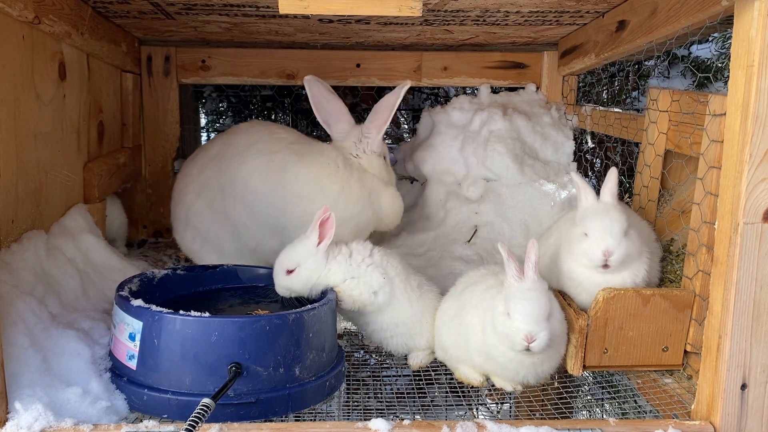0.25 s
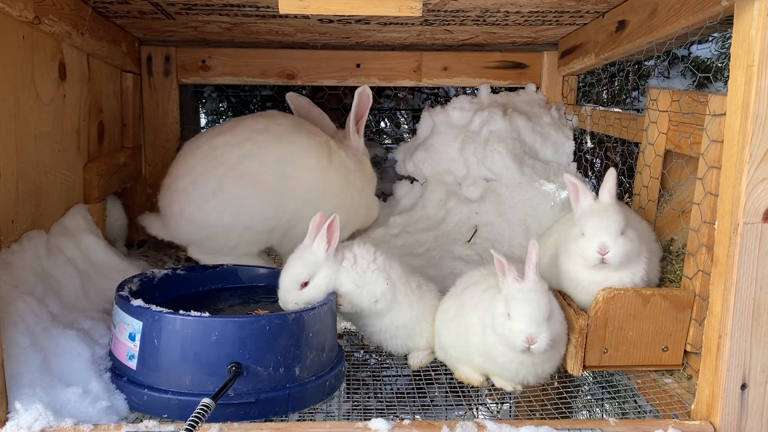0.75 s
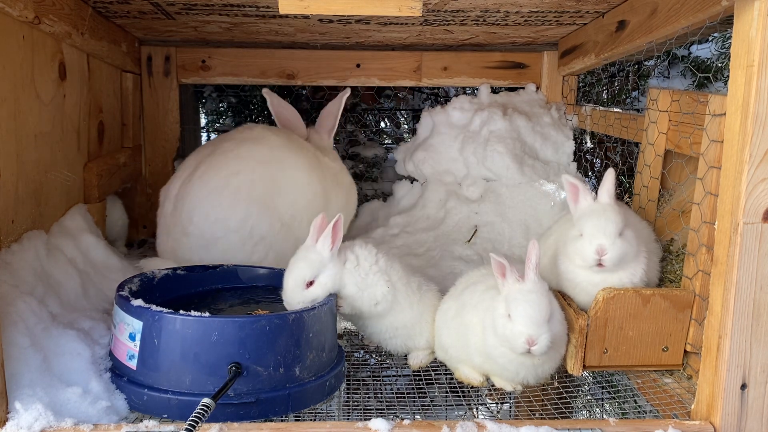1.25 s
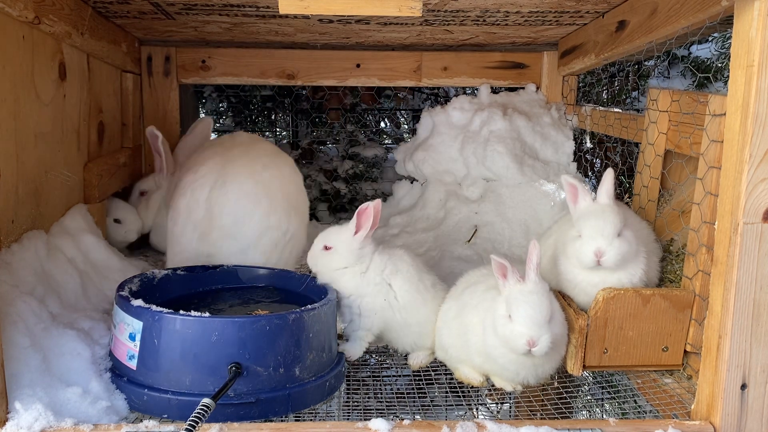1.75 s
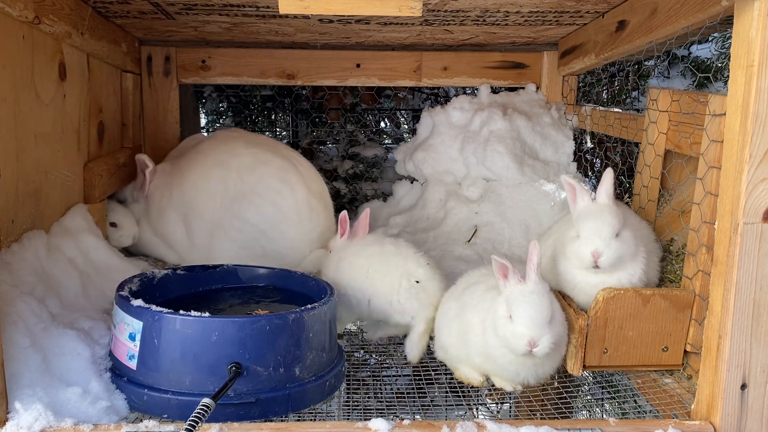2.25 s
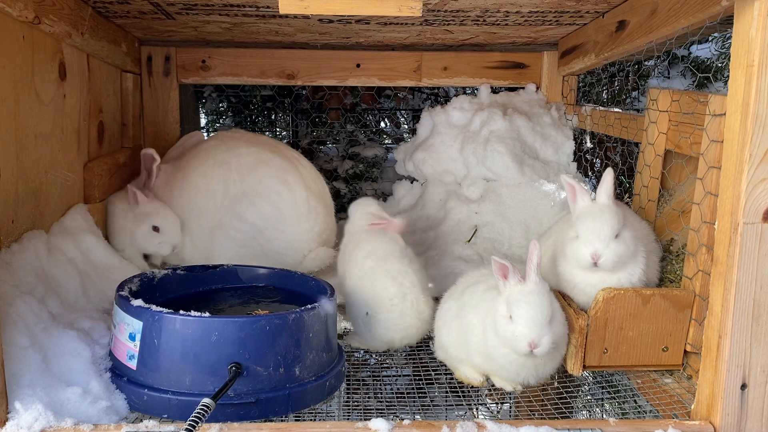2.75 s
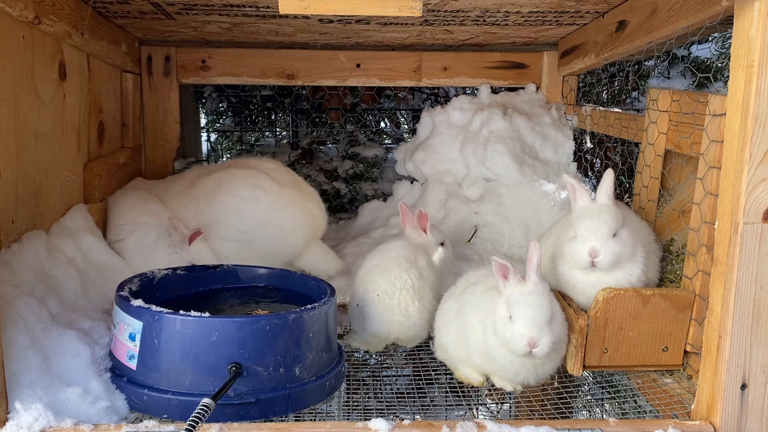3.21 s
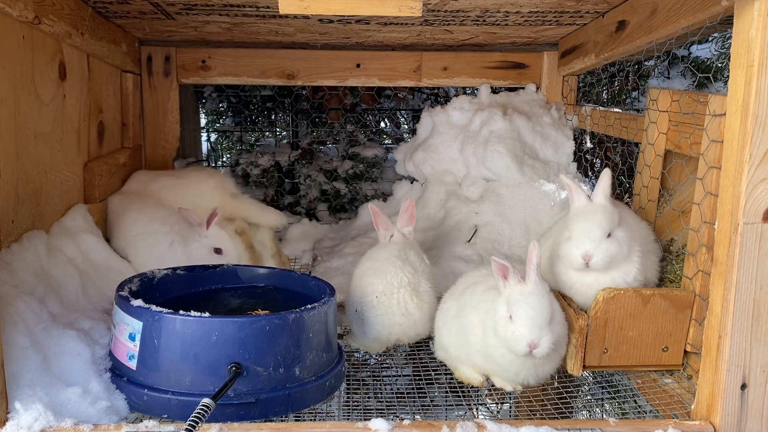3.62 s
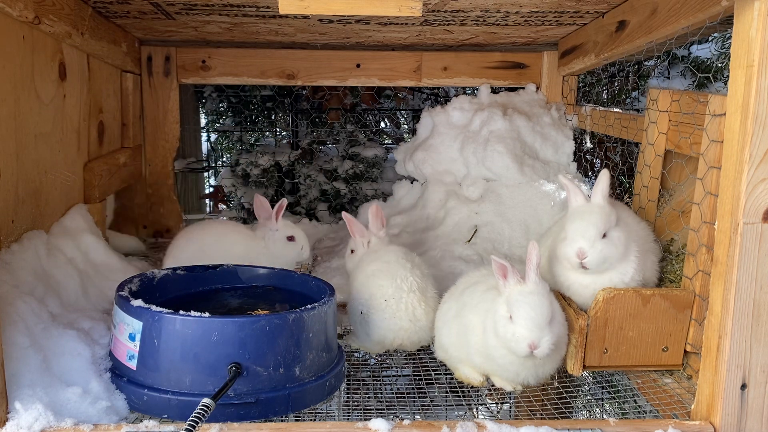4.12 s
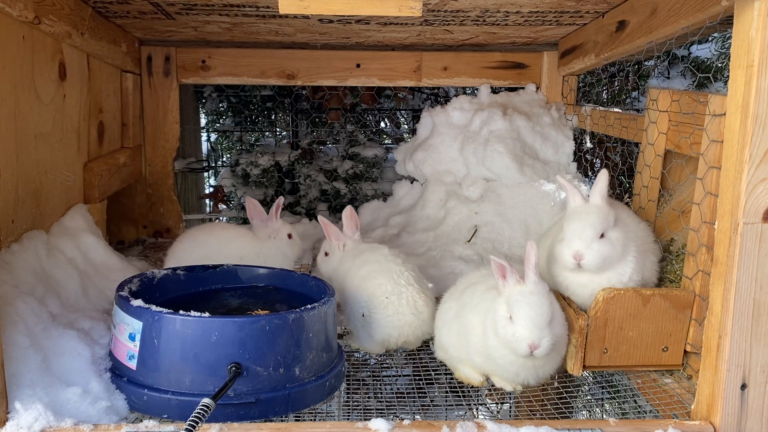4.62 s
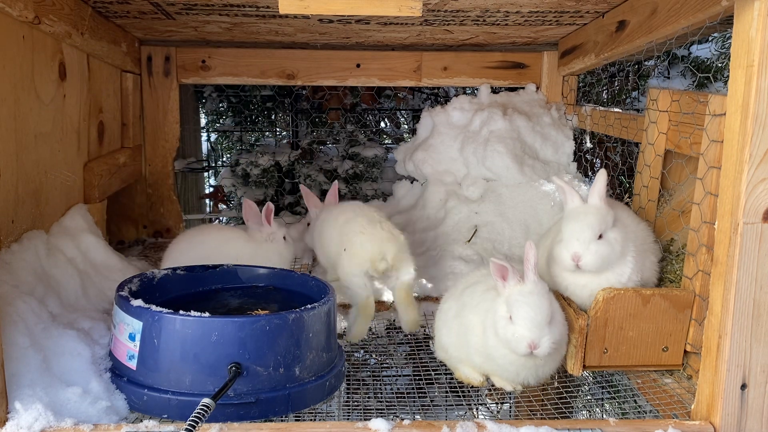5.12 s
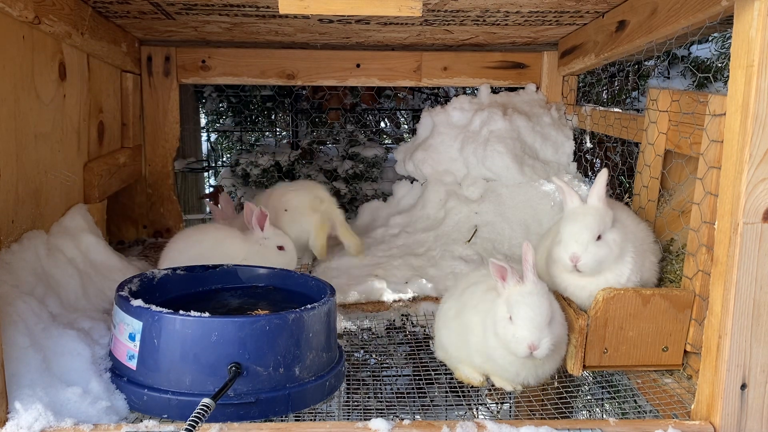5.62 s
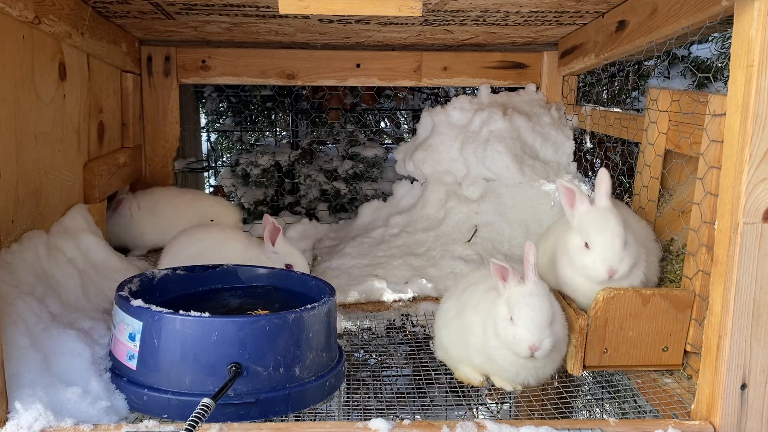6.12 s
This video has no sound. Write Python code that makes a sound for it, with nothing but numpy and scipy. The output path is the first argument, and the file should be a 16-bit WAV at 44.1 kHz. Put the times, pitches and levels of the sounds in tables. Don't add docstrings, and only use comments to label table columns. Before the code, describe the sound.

Rabbits shuffle and scuff on a springy wire floor in a wooden hutch, with light ticks, soft thumps and one louder wooden knock.

```python
import sys
import numpy as np
from scipy import signal
from scipy.fft import rfft, irfft, next_fast_len
from scipy.io import wavfile
from scipy.ndimage import uniform_filter1d

SR = 44100
rng = np.random.default_rng(int(sys.argv[2]) if len(sys.argv) > 2 else 0)


def digitize_waveform(pressure):
    field = np.atleast_2d(pressure).T
    bounded = np.clip(field, -1, 1)
    quanta = np.round(bounded * 32767).astype(np.int16)
    wavfile.write(sys.argv[1], SR, quanta)


def voltage_ratio(decibels):
    exponent = np.asarray(decibels, float) / 20
    return 10 ** exponent


N = 280322
SIZE = next_fast_len(N + 2000)
HZ = np.fft.rfftfreq(SIZE, 1 / SR)

# (time [s], floor shake level [dB], shuffle level [dB], time to die by 20 dB [s])
STEPS = [(0.0, -47.5, -60.5, 0), (0.28, -51, -56, 0.6), (0.57, -54, -47, -0.12), (0.67, -45, -59, 0.3),
         (0.78, -46, -57, 0.36), (1.27, -57, -64, 2), (2.0, -46.5, -56, 0.5), (2.81, -65, -67, 1),
         (2.92, -50.5, -60, 0.9), (3.17, -51.5, -64, 1.2), (3.39, -45, -65, -0.1), (3.72, -43.5, -56, 0.53),
         (4.0, -38, -55, 0.37), (4.16, -69.5, -67, -3), (4.27, -56, -46.5, 0.26), (4.34, -58, -48.5, 0.2),
         (4.45, -43.5, -62, 0.13), (4.6, -46, -45.5, 0.23), (4.76, -47.5, -53.5, 0.47),
         (4.908, -60, -49, 0), (5.05, -57, -72, -0.3), (5.31, -50, -77, 0.34), (5.86, -59, -61.5, -0.1),
         (6.05, -55, -62.5, 0.7), (6.2, -50.5, -73, 3)]


def rms_one(x):
    return x / np.sqrt(np.mean(x ** 2) + 1e-20)


def at_hz(points, hz, axis=1):
    points = np.array(points)
    return np.interp(np.log(hz + 1), np.log(points[:, 0]), points[:, axis])


def drift(rate):
    r = np.exp(-80 * np.pi * rate / SR)
    slow = signal.lfilter([1], [1, -2 * r, r * r], rng.standard_normal(N // 40 + 2002))[2000:]
    return np.interp(np.arange(N) / 40, np.arange(len(slow)), rms_one(slow))


def resonance(x, hz, width_hz):
    r = np.exp(-np.pi * width_hz / SR)
    zeros = np.array([1, 0, -1]) * (1 - r * r) / 2
    return signal.lfilter(zeros, [1, -2 * r * np.cos(2 * np.pi * hz / SR), r * r], x)


def cut(x, hz, kind, order=2):
    return signal.sosfilt(signal.butter(order, np.clip(hz, 10, .45 * SR), kind, fs=SR, output="sos"), x)


def colour(x, spectrum):
    return rms_one(irfft(rfft(x, SIZE) * voltage_ratio(at_hz(spectrum, HZ)), SIZE)[..., :N])


def add(out, s, sound, peak_db):
    at = round(s * SR)
    out[at:at + len(sound)] += (voltage_ratio(peak_db) * sound / np.abs(sound).max())[:N - at]


def fade(t, t60):
    return voltage_ratio(-60 * t / t60)


def swells(s, peak_db, rise, fall, rest_db):
    t = np.arange(0, N + 64, 64) / SR - s[:, None]
    slope_s = np.where(t < 0, rise[:, None], fall[:, None])
    drop = 20 * np.abs(t) / np.clip(slope_s, .004, 2)
    power = (voltage_ratio(peak_db[:, None] - drop) ** 2).sum(axis=0) + voltage_ratio(rest_db) ** 2
    return np.interp(np.arange(N) / 64, np.arange(len(power)), 10 * np.log10(power))


def friction(level_db, spectrum, per_s, spread_db, patchy_db, tint_db):
    sizes = voltage_ratio(spread_db * np.minimum(rng.exponential(1, N), 4)) * rng.choice([-1, 1], N)
    grains = rfft(colour(sizes * (rng.random(N) < per_s / SR), spectrum), SIZE)
    edges = np.geomspace(spectrum[0][0], spectrum[-1][0], 8)
    band = np.digitize(HZ, edges[1:-1])
    tinted = sum(voltage_ratio(tint_db * drift(7.0)) * irfft(grains * (band == k), SIZE)[:N] for k in range(7))
    patches = drift(9.2) + drift(60)
    return voltage_ratio(level_db + patchy_db * patches) * rms_one(tinted)


def scuffs(rows, treble_db, swell, top_hz):
    out, t = np.zeros(N), np.arange(4000) / SR
    for s, db, hz, t60 in rows:
        spray = rng.standard_normal(len(t)) * voltage_ratio(3 * rng.standard_normal(len(t)))
        body = rms_one(cut(spray, [1100, 4000], "band") * 0.66 + 0.77 * resonance(spray, hz, 0.11 * hz))
        treble = cut(cut(spray, 4100, "high"), 4400, "low", order=1)
        treble += 0.93 * resonance(spray, 4100, 300)
        sound = body + voltage_ratio(treble_db + 4.5) * rms_one(cut(treble, top_hz, "low"))
        add(out, s - 0.315 * swell, sound * np.minimum(t / swell, 1) * fade(t, t60), db - 3.0)
    return out


def slips(rows, width):
    out, t = np.zeros(N), np.arange(6000) / SR - .04
    for s, db, hz, fall in rows:
        width_hz, rise = width * hz, 0.71 * fall
        jerks = rng.standard_normal(len(t)) * voltage_ratio(6.7 * rng.standard_normal(len(t)))
        tone = resonance(resonance(jerks, hz, width_hz), hz, 1.5 * width_hz)
        add(out, s - .04, tone * np.exp(-np.abs(t) / np.where(t < 0, rise, fall)), db)
    return out


def rings(rows, width):
    out, t = np.zeros(N), np.arange(5000) / SR
    for s, db, hz, t60 in rows:
        push = rng.standard_normal(len(t)) * np.minimum(t * hz / 0.85, 1) * fade(t, np.clip(t60, .004, .3))
        add(out, s, resonance(resonance(push, hz, width * hz), hz, 2 * width * hz), db)
    return out


def bump():
    # (pitch [Hz], peak level [dB], t60 [s], build-up [s], delay [s])
    modes = [(99.5, -42, .48, .01, .0025), (148.7, -23.5, .24, .011, -.0021),
             (252.5, -21, .087, .066, .0011), (282, -40, .12, .015, .0035), (323.4, -32, .048, .009, 0),
             (427.8, -25.2, .048, .0003, .0027), (655, -27.7, .031, .0009, .0009),
             (825, -28.2, .0104, .006, .0029), (850, -29.1, .021, .0026, .0013)]
    out, t = np.zeros(N), np.arange(20000) / SR
    for hz, db, t60, build, delay in modes:
        ring = np.sin(2 * np.pi * hz * t) * (1 - np.exp(-t / build)) ** 2 * fade(t, t60)
        add(out, 4.587 + delay, ring, db)
    return out


def landings():
    # (time [s], peak level [dB], end pitch [Hz], length [s], extra pitch at the start [share])
    rows = [(0.461, -43, 62, 0.02, 0.27), (0.845, -41.5, 88, 0.021, 0.61), (1.977, -48, 88, 0.077, 0.36),
            (3.017, -46.5, 100, 0.04, 0.86), (3.693, -40, 63.3, 0.05, 0.46), (3.748, -44, 65.4, 0.036, 0.4),
            (3.998, -40.5, 67.2, 0.0226, 2.3), (4.049, -43, 64, 0.034, 0.24), (4.11, -36, 85.3, 0.022, 0.9),
            (4.135, -37.5, 56.2, 0.033, 0.33), (4.248, -40, 82.8, 0.051, 0.97),
            (4.317, -41, 92, 0.04, 0.97), (4.366, -38.5, 65, 0.028, 0.25), (4.801, -40, 70.4, 0.032, 0.19),
            (5.015, -35.5, 64.4, 0.06, 2.6), (5.1, -42.5, 71, 0.022, 0.54), (5.185, -38, 58.6, 0.041, 0.3),
            (5.238, -41, 64.6, 0.052, 0.6)]
    out = np.zeros(N)
    for s, db, hz, length, glide in rows:
        t = np.arange(round(1.3 * length * SR)) / SR
        pitch = hz * (1 + glide * np.exp(-t / 0.0131))
        bend = np.sin(2 * np.pi * np.cumsum(pitch) / SR)
        rattle = rms_one(resonance(rng.standard_normal(9000), 3.06 * hz, 23)[-len(t):])
        add(out, s, (bend + .07 * rattle) * np.abs(np.sin(np.pi * t / t[-1])) ** .8, db)
    return out


def floor_shake():
    s, shake_db, _, fall = np.transpose(STEPS)
    level_db = swells(s, shake_db, 0.68 * fall, fall, rest_db=-65)
    push = rng.standard_normal((2, N))
    sway = resonance(push[0], 74.9, 6.5) + 0.3 * resonance(push[1], 101.7, 8.3)
    return voltage_ratio(level_db - 7.5) * rms_one(sway)


def thuds():
    # (time [s], peak level [dB], pitch [Hz], t60 [s])
    rows = [(0.585, -49.5, 212, 0.23), (2.035, -46, 183, 0.1), (3.24, -54, 274, 0.062),
            (3.435, -45, 647, 0.18), (3.44, -51.5, 300, 0.089), (3.53, -52.5, 348, 0.11),
            (3.995, -39, 200, 0.11), (4.262, -43.5, 170, 0.18), (4.625, -35, 72, 0.084),
            (4.23, -52, 478, 0.054), (5.012, -52.5, 580, 0.082), (5.018, -49, 400, 0.042),
            (5.03, -61, 186, 0.046), (5.812, -50.5, 249, 0.039), (5.875, -47.5, 139, 0.07),
            (6.05, -57.5, 160, 0.23)]
    return rings(rows, width=0.33)


def shuffle():
    # (frequency [Hz], density [dB per Hz])
    spectrum = [(90, -1), (150, 14), (300, 3), (600, 0.5), (1200, -17.5), (2000, -53)]
    s, _, shuffle_db, fall = np.transpose(STEPS)
    level_db = swells(s, shuffle_db, 0.68 * fall, fall, rest_db=-64.5)
    return friction(level_db - 5.0, spectrum, per_s=4800, spread_db=2.0, patchy_db=2.5, tint_db=3.5)


def brushes():
    # (time at loudest [s], peak level [dB], top frequency [Hz], half length [s])
    rows = [(3.768, -47, 620, 0.011), (3.957, -50, 800, 0.012), (3.989, -42, 845, 0.012),
            (4.01, -38, 970, 0.0055), (4.243, -48, 770, 0.0086), (4.266, -44, 664, 0.011),
            (4.326, -46.5, 1050, 0.014), (4.344, -43, 820, 0.015), (4.598, -45, 856, 0.0077),
            (5.021, -53, 810, 0.0049), (5.18, -55, 694, 0.0053)]
    out, t = np.zeros(N), np.arange(3600) / SR - .04
    for s, db, top_hz, half in rows:
        puff = cut(rng.standard_normal(len(t)), [180, top_hz], "band")
        add(out, s + t[0], puff * np.exp(-(t / half) ** 2), db)
    return out


def claw_scuffs():
    # (time [s], peak level [dB], colour [Hz], t60 [s])
    rows = [(0.066, -56.5, 3800, 0.046), (0.5778, -51, 3220, 0.15), (0.7135, -40, 1900, 0.058),
            (0.8142, -34, 4170, 0.028), (1.311, -47.5, 2720, 0.061), (1.335, -54.5, 2620, 0.41),
            (1.5005, -53, 2170, 0.018), (1.7561, -41.5, 2250, 0.043), (1.931, -56, 4080, 0.084),
            (2.0523, -51, 2600, 0.073), (3.033, -46, 2260, 0.035), (3.071, -58, 1720, 0.02),
            (3.2495, -52, 2400, 0.033), (3.4684, -47.5, 1930, 0.06), (3.9469, -41.5, 1490, 0.045),
            (4.259, -54, 1860, 0.082), (4.3284, -63.5, 1500, 0.087), (4.4455, -43.5, 4570, 0.027),
            (5.012, -48.5, 4280, 0.046), (5.35, -60, 4300, 0.049)]
    return scuffs(rows, treble_db=-8.5, swell=0.002, top_hz=17000)


def pad_scuffs():
    # (time [s], peak level [dB], colour [Hz], t60 [s])
    rows = [(0.6085, -42, 1600, 0.021), (1.3748, -54, 1760, 0.076), (1.431, -54.5, 2530, 0.28),
            (1.658, -44, 3420, 0.059), (2.0195, -39, 2480, 0.045), (3.1382, -47, 1390, 0.015),
            (3.4007, -46.5, 2210, 0.17), (3.4337, -46.5, 1590, 0.14), (3.6486, -48, 3480, 0.089),
            (3.7532, -46, 1530, 0.051), (3.9046, -48, 2140, 0.12), (3.9694, -43, 2080, 0.043),
            (4.5945, -31, 4830, 0.033), (4.6495, -36.5, 2970, 0.042), (4.6643, -29.5, 4570, 0.044),
            (4.8864, -54, 1940, 0.09), (5.0669, -56.5, 1790, 0.047)]
    return scuffs(rows, treble_db=-22.5, swell=0.0022, top_hz=8500)


def fur_rub():
    # (time at loudest [s], level [dB], time to rise 20 dB [s], time to die by 20 dB [s])
    strokes = [(0.49, -70, -0.07, 0.44), (0.6, -56.5, 0.09, 0.01), (0.721, -64, 0.03, -0.12),
               (0.81, -71.5, 0.63, 0.23), (1.34, -65.5, 0.06, 0.16), (1.44, -64, 0.06, 0.03),
               (1.66, -85, 1, -1), (1.77, -67.5, 0.05, 0.1), (1.93, -70.5, .1, 0.1),
               (2.02, -78.5, -0.5, 0.9), (2.47, -75, 0.2, 0.4), (2.67, -75, -0.2, 1),
               (2.82, -66.5, 0.07, 0.3), (2.995, -66, 0.08, 0.5), (3.036, -52, 0.0861, -0.02),
               (3.132, -52.5, 0.12, 0.05), (3.27, -60, 0.31, -0.15), (3.44, -58, 0.17, 0.1),
               (3.63, -60.5, 0.27, 0.3), (3.91, -62.5, 0.1, 0.1), (3.75, -70, 1, 0.9),
               (3.97, -54, 0.01, 0.05), (4.04, -61, 0, 0), (4.11, -71, -0.2, -0.3),
               (4.318, -65.5, 0.14, 0.07), (4.424, -66, -1.5, 0.44), (4.596, -57, -0.07, 0.07),
               (4.67, -54.5, -0.12, 0.05), (4.93, -65.5, -0.04, 0.2), (5.13, -67, 0.12, 0.17),
               (5.29, -68, 0.3, 0.2), (5.54, -69.5, 0.06, 0.18), (5.91, -83, 1, 2.5)]
    # (frequency [Hz], density [dB per Hz])
    spectrum = [(2000, 2), (3400, -5), (4300, -6), (4800, -5.5), (5500, -5.5), (7000, -7), (11000, -9),
                (16000, -13)]
    level_db = swells(*np.transpose(strokes), rest_db=-100)
    return friction(level_db - 4.0, spectrum, per_s=5000, spread_db=2.0, patchy_db=1.5, tint_db=3.0)


def snow_crunch():
    # (time at loudest [s], level [dB], time to die by 20 dB [s])
    rows = [(0.072, -67.5, 0.08), (0.366, -69, 0.01), (0.599, -65, 0.02), (0.72, -59, -0.01),
            (1.449, -69.5, 0.18), (1.669, -72, 0.2), (1.79, -73, 0.1), (1.93, -72.5, 0.03),
            (2.02, -71.5, 0.33), (2.51, -78.5, 0.5), (3.03, -77, -0.5), (3.6, -77, 0.3), (3.13, -70, -0.9),
            (3.266, -65, 0.06), (3.43, -71, -0.45), (3.98, -78, -2), (4.01, -67.5, 0.2), (4.34, -71, 0.1),
            (4.5, -77, 0.5), (4.62, -87, 1), (4.68, -69, 0.14), (4.891, -61.5, 0.06), (5.25, -76.5, 0.5),
            (5.83, -74.5, 0.7)]
    # (frequency [Hz], density [dB per Hz])
    spectrum = [(700, -20), (1200, 9.5), (1800, 4), (2700, -2), (3600, -15.5), (6000, -21.5)]
    s, db, fall = np.transpose(rows)
    level_db = swells(s, db, 0.26 * fall, fall, rest_db=-89.5)
    return friction(level_db + 2.5, spectrum, per_s=3300, spread_db=4.0, patchy_db=2.5, tint_db=1.5)


def snaps():
    # (time [s], peak level [dB], lowest frequency [Hz])
    rows = [(s, db, 5000) for s, db in [(0.2176, -67), (0.357, -69), (0.3721, -66), (0.5982, -45.5),
            (0.63, -55), (0.973, -62), (2.153, -65), (3.3784, -55), (3.5456, -58), (4.4283, -69),
            (4.6977, -46), (5.52, -63), (5.7324, -63)]] + [(1.72, -41, 8000), (5.9115, -37.5, 12600)]
    out, t = np.zeros(N), np.arange(800) / SR
    for s, db, hz in rows:
        crack = rng.standard_normal(len(t)) * (fade(t, 0.0038) + 0.15 * fade(t, 0.035))
        add(out, s, cut(crack, hz, "high"), db + 3.5)
    return out


def ticks():
    # (time [s], peak level [dB], ring [Hz], t60 [s])
    rows = [(0.103, -56, 1060, 0.012), (0.337, -51, 1180, 0.014), (0.611, -45.5, 1040, 0.0045),
            (0.735, -47.5, 1460, 0.0088), (0.777, -48.5, 1080, 0.006), (2.11, -42.5, 1200, 0.0094),
            (2.355, -61, 1385, 0.031), (2.514, -45.5, 1200, 0.0084), (2.726, -55, 940, 0.0071),
            (3.209, -55.5, 1270, 0.015), (3.555, -51, 980, 0.0087), (3.579, -42, 1210, 0.0066),
            (4.492, -49, 1010, 0.007), (4.911, -53.5, 1100, 0.01), (5.487, -66.5, 1290, 0.01),
            (5.695, -58, 1230, 0.022), (5.776, -66, 1460, 0.0086)]
    out, t = np.zeros(N), np.arange(1800) / SR
    for s, db, hz, t60 in rows:
        ring = np.sin(2 * np.pi * hz * t) * fade(t, t60)
        ring += .7 * np.sin(2 * np.pi * 1.6 * hz * t) * fade(t, .006)
        ring += .4 * np.sin(2 * np.pi * 2.7 * hz * t) * fade(t, .003)
        echo = .3 * cut(np.interp(t - .0037, t, ring, left=0), 2500, "low")
        wash = cut(rng.standard_normal(len(t)), [500, 2400], "band") * fade(t, 0.11)
        wash *= np.minimum(t / 0.0008, 1)
        add(out, s + .0007, -cut(ring + echo + .2 * wash, [450, 3300], "band"), db + 7)
    return out


def squeaks():
    # (time at loudest [s], peak level [dB], pitch [Hz], fall [s])
    rows = [
        (1.316, -57, 2650, 0.0046),
        (1.352, -57, 2690, 0.013),
        (1.387, -59, 1720, 0.0087),
        (1.452, -48.5, 2400, 0.019),
        (1.454, -51.5, 1840, 0.018),
        (2.13, -66, 2980, 0.013),
        (3.424, -54, 1360, 0.01),
        (3.442, -30, 1290, 0.0063),
        (3.975, -39, 2220, 0.0093),
    ]
    return slips(rows, width=0.18)


def whines():
    # (time at loudest [s], peak level [dB], pitch [Hz], fall [s])
    rows = [(0.069, -64, 4050, 0.0086), (0.164, -78, 4050, .005), (0.49, -68, 7700, .006),
            (0.487, -77, 5000, 0.0042), (1.316, -60, 2800, 0.0034), (1.918, -67, 3020, 0.0036),
            (1.94, -64, 4250, .005), (2.021, -51, 4170, 0.0026), (3.033, -59, 6960, 0.011),
            (3.035, -56, 3250, 0.0059), (3.072, -61, 11200, 0.0018), (3.257, -71, 7700, 0.0054),
            (3.434, -62, 6900, .012), (3.445, -51, 5000, 0.012), (3.913, -59, 4570, .006),
            (3.972, -50, 4080, .005), (4.311, -64.5, 10300, .003), (4.429, -63, 7500, 0.0025)]
    return slips(rows, width=0.1)


def pings():
    # (time [s], peak level [dB], pitch [Hz], t60 [s])
    rows = [(0.337, -51.5, 1540, .03), (0.612, -44.5, 2400, 0.015), (0.816, -44, 2560, 0.029),
            (0.974, -66, 5070, 0.011), (1.312, -61, 2790, .03), (1.347, -53, 1680, .03),
            (1.365, -47, 1750, .02), (1.3785, -49.5, 1740, 0.033), (1.3785, -58, 4100, .015),
            (1.404, -61, 4900, 0.012), (1.418, -63.5, 2700, .02), (1.432, -58, 3940, .02),
            (1.436, -48.5, 1420, 0.019), (2.113, -46, 1600, 0.02), (2.516, -50.5, 1560, 0.027),
            (2.9275, -58.5, 2590, 0.018), (2.9934, -57.5, 4560, 0.03), (3.034, -57, 3240, 0.023),
            (3.1041, -56, 4830, .03), (3.1371, -53, 3980, .015), (3.152, -56, 3420, .02),
            (3.184, -60.5, 3560, 0.022), (3.262, -66, 4900, .02), (3.272, -57, 4900, 0.018),
            (3.4284, -56, 4900, .03), (3.441, -55, 4970, 0.05), (3.425, -64, 6800, 0.045),
            (3.472, -54, 1080, .02), (3.7048, -69.5, 3470, .02), (3.73, -59, 2500, .03),
            (3.7596, -54.5, 3600, 0.023), (3.8709, -62.5, 4400, 0.12), (3.9018, -54, 2600, 0.025),
            (3.911, -56.5, 4600, .03), (3.9697, -47, 4300, 0.046), (3.985, -50, 1630, 0.027),
            (4.046, -52.5, 1900, .015), (4.0495, -54.5, 4360, 0.044), (4.0875, -45, 1760, 0.004),
            (4.105, -68, 4530, .04), (4.266, -74, 4500, .03), (4.341, -56, 2570, 0.013),
            (4.594, -34, 4800, 0.012), (4.665, -34.5, 4770, 0.01), (4.685, -58, 1480, 0.012),
            (4.697, -54, 3430, 0.011), (5.012, -61, 4380, .03)]
    return rings(rows, width=0.18)


def catches():
    # (time [s], peak level [dB], pitch [Hz], t60 [s])
    rows = [(0.084, -54, 1190, 0.02), (0.364, -58.5, 1760, 0.01), (0.735, -49, 1280, .015),
            (1.335, -59.5, 2700, .025), (1.47, -56, 2490, .05), (1.488, -54, 1910, 0.033),
            (1.649, -57, 2320, .012), (1.659, -53, 3560, 0.026), (1.659, -49.5, 2420, 0.025),
            (1.7, -59, 2000, .03), (1.93, -61, 2580, 0.053), (3.015, -64, 6800, .08),
            (3.12, -62, 2200, .03), (3.125, -57.5, 6500, .04), (3.6, -59, 4440, 0.071),
            (3.625, -56, 4600, 0.1), (3.68, -58, 4300, .05), (4.008, -57, 4600, .03),
            (4.105, -66, 7450, 0.06), (4.3, -63, 5000, 0.035), (4.316, -62, 6550, 0.055),
            (4.421, -67, 6000, .008), (5.066, -56, 2470, 0.022), (5.35, -65.5, 4500, .04),
            (5.42, -68, 3420, 0.044), (5.815, -58, 1880, 0.087), (5.83, -64, 2850, 0.11),
            (6.3, -65, 2540, 0.11)]
    return rings(rows, width=0.24)


def wide_noise(waver_db):
    # (frequency [Hz], left-right likeness [-1 to 1, clipped])
    likeness = [(60, 0.93), (130, 0.89), (290, 0.31), (640, -0.33), (1200, -0.61), (2500, 0.56),
                (5000, -1.6)]
    alike = np.clip(at_hz(likeness, HZ), -1, 1)
    mid, side = rfft(rng.standard_normal((2, N)) * voltage_ratio(waver_db * drift(0.67)), SIZE)
    return irfft(np.sqrt(1 + alike) * mid + np.sqrt(1 - alike) * side * [[1], [-1]], SIZE)[:, :N]


def background():
    # (frequency [Hz], density [dB per Hz])
    traffic = [(25, -27), (45, 3.5), (70, -3.5), (150, -17), (500, -23), (900, -21.5), (1500, -30.5),
               (2100, -46), (3000, -92), (5000, -66.5)]
    # (frequency [Hz], density [dB per Hz])
    hiss = [(1500, -7), (3500, -7), (7000, -3), (11000, -1), (12300, -2), (13600, -32), (16000, -50)]
    hum = voltage_ratio(-53.5) * colour(wide_noise(waver_db=1.8), traffic)
    return hum + voltage_ratio(-93) * colour(wide_noise(waver_db=-1.0), hiss)


def at_ports(x):
    # (frequency [Hz], left over right [dB], left leads [radians])
    ports = [(100, 0, 0.06), (402, 2, 0.95), (1040, 2.5, 1.08), (2400, 3, 1.35), (3800, 7.5, 1.11),
             (6900, -2, 0.92)]
    half = voltage_ratio(at_hz(ports, HZ) / 2) * np.exp(.5j * at_hz(ports, HZ, axis=2))
    lags, signs = rng.uniform(0.0013, 0.039, (2, 8, 1)), rng.choice([-1, 1], (2, 8, 1))
    echoes = (signs * fade(lags, 0.012) * np.exp(-2j * np.pi * HZ * lags)).sum(axis=1)
    echoes *= HZ / (HZ + 400)
    return irfft(rfft(x, SIZE) * (np.array([half, 1 / half]) + voltage_ratio(-24) * echoes), SIZE)[:, :N]


def scene():
    rub = fur_rub()
    wire_hum = voltage_ratio(-5) * resonance(rub, 4570, 430)
    paws = claw_scuffs() + pad_scuffs()
    near = rub + wire_hum + snow_crunch() + shuffle() + paws + snaps() + squeaks() + brushes()
    wall = at_ports(bump()) * voltage_ratio(np.array([[1.0], [-1.0]]))
    struck = at_ports(pings() + thuds() + catches() + whines())
    return at_ports(near) + wall + struck + ticks() + landings() + floor_shake() + background()


def gate_air(x):
    air = irfft(rfft(x, SIZE) * (HZ > 13400), SIZE)[:, :N]
    level_db = 10 * np.log10(uniform_filter1d((air ** 2).mean(axis=0), 1200) + 1e-20)
    return x - air * (1 - np.clip((level_db + 98) / 3, 0, 1))


def top_cut(x):
    return signal.sosfilt(signal.butter(12, 16630, fs=SR, output="sos"), x)


def record(dry):
    join_hz, in_step_hz, turn_hz, top_hz = 6200, 6950, 4150, 15800
    both = rfft(dry, SIZE)
    turn = np.exp(1j * np.pi * (HZ - in_step_hz) / turn_hz * np.array([[-1], [1]]))
    share = np.clip((HZ - join_hz) / 600 + .5, 0, 1)
    spread = (share * both[1] * turn + (1 - share) * both) / (1 + (HZ / top_hz) ** 44)
    mix = gate_air(irfft(spread, SIZE)[:, :N])
    return top_cut(mix)


dry = scene()
out = record(dry)
digitize_waveform(out)
```